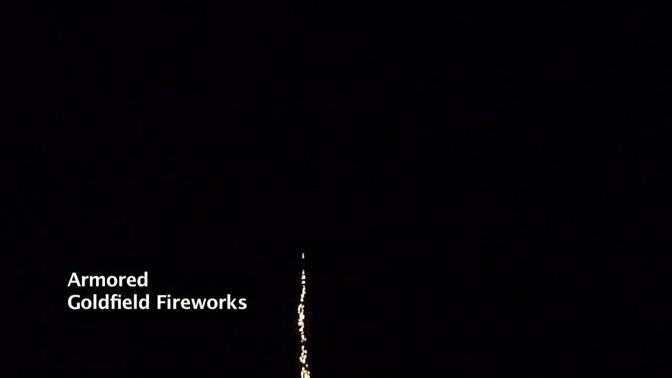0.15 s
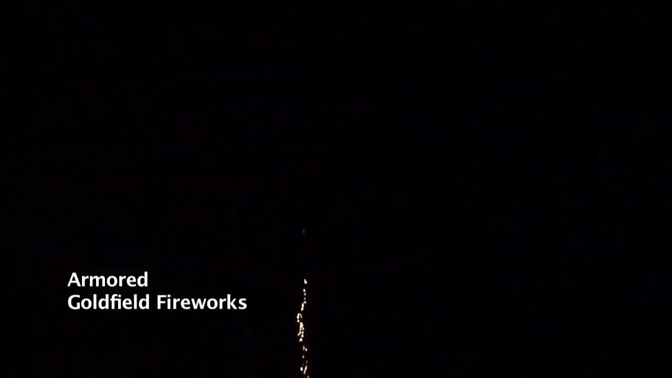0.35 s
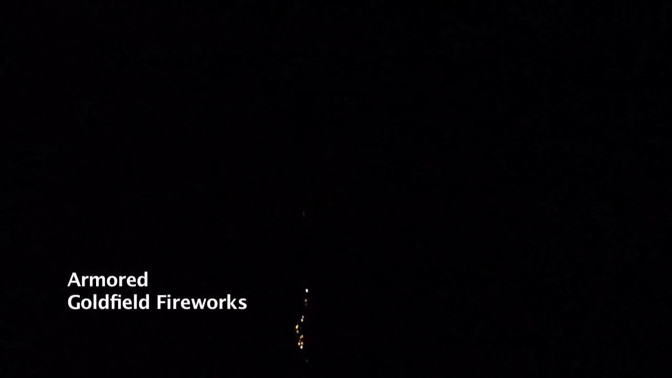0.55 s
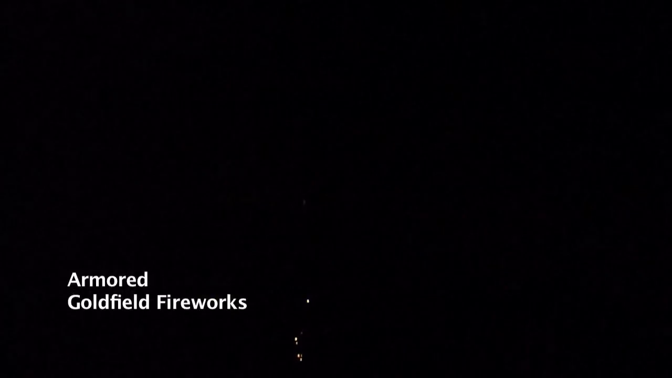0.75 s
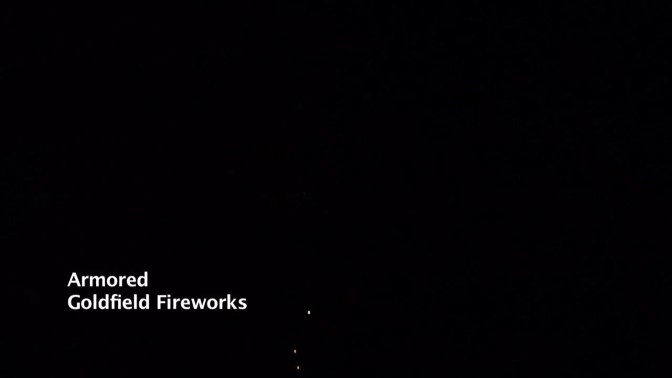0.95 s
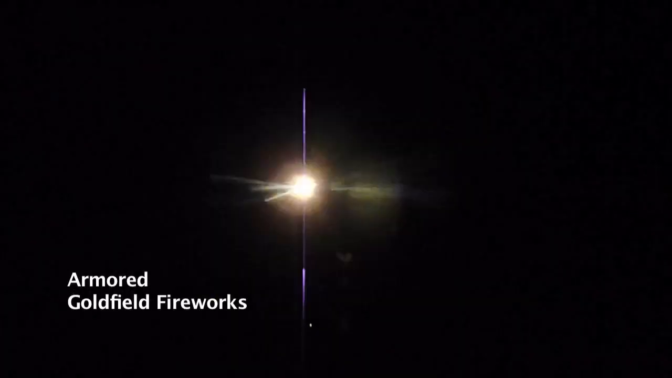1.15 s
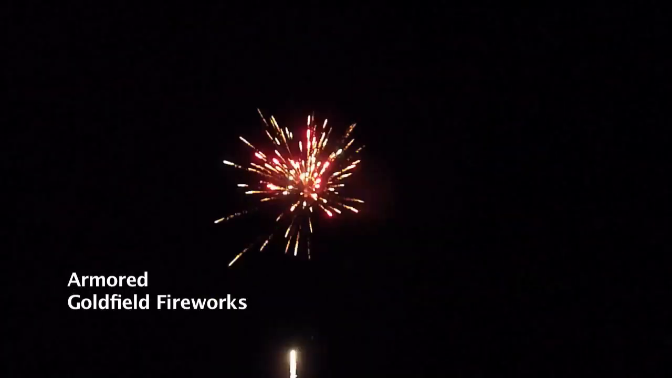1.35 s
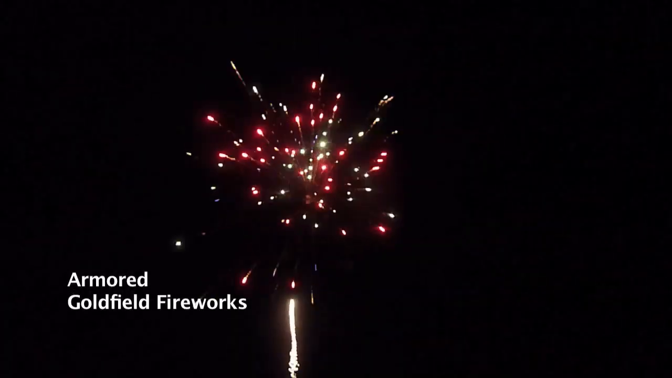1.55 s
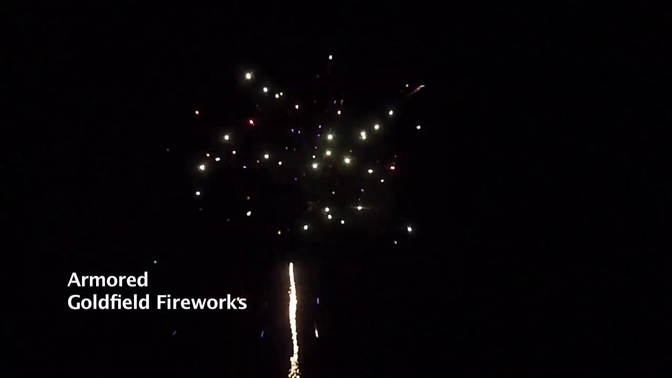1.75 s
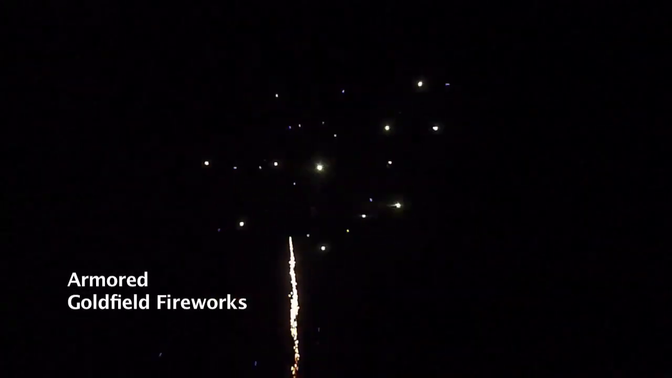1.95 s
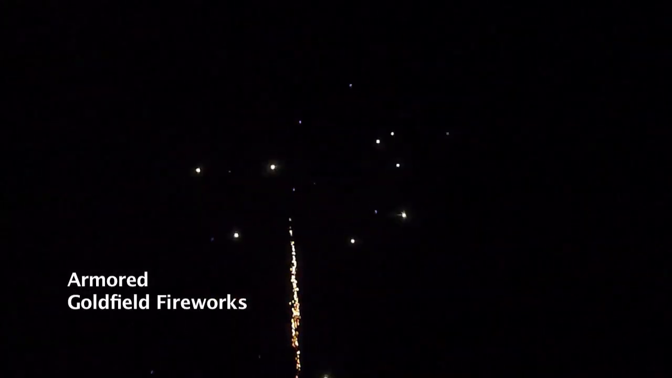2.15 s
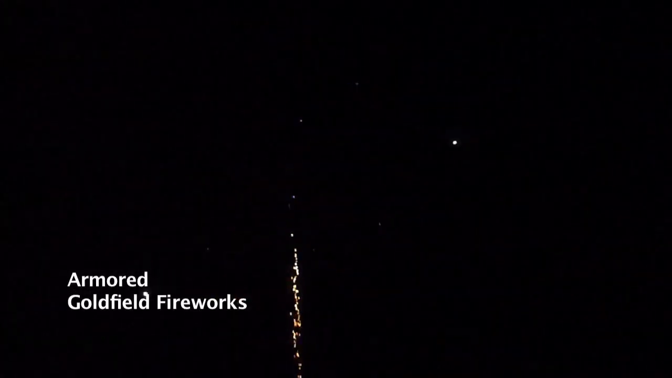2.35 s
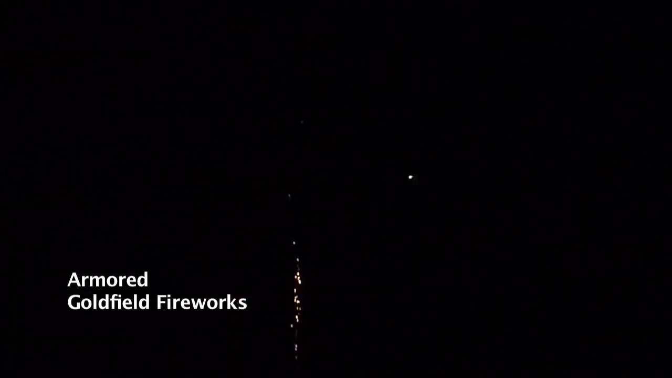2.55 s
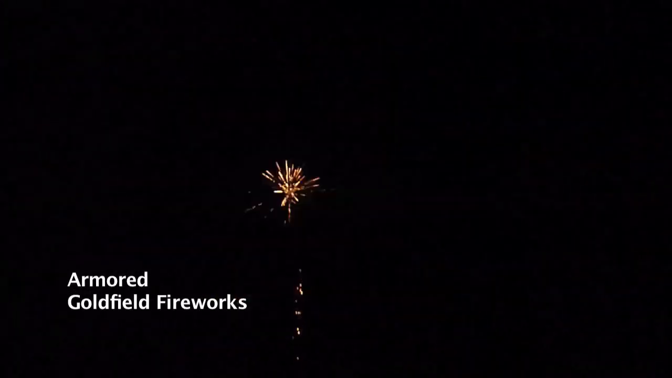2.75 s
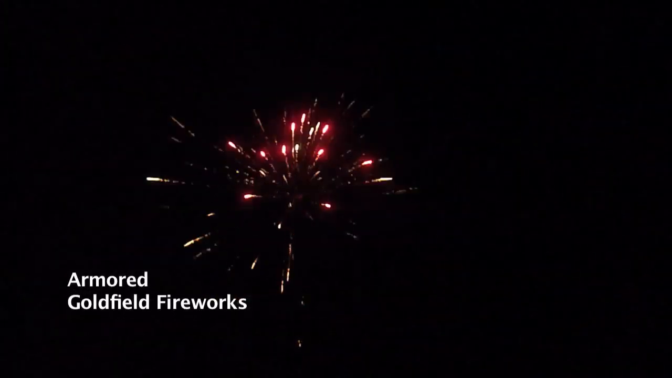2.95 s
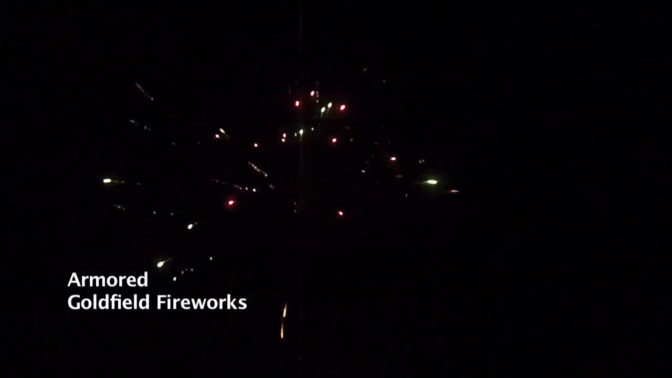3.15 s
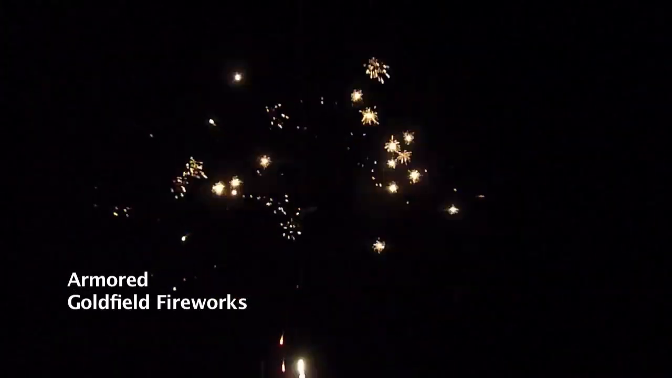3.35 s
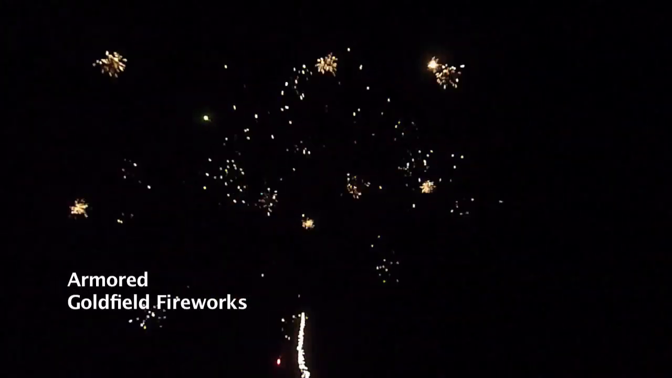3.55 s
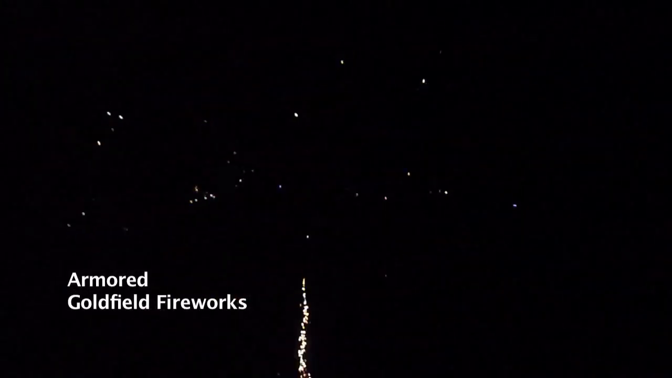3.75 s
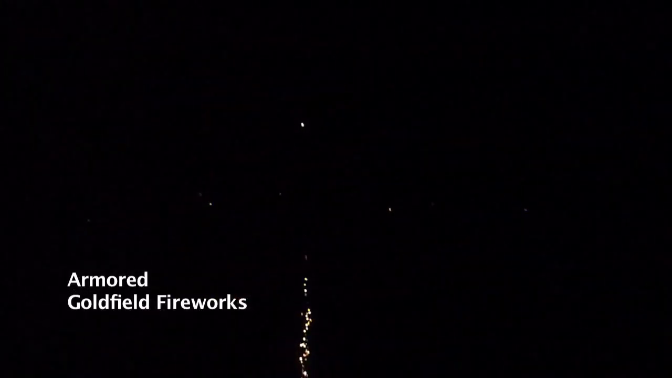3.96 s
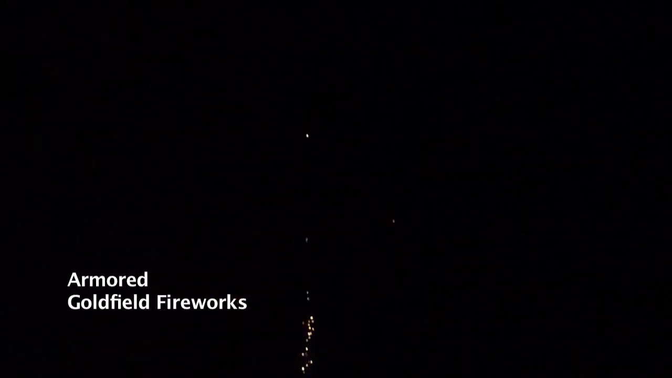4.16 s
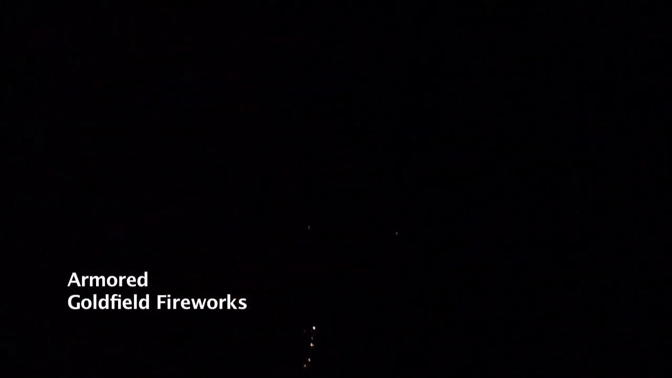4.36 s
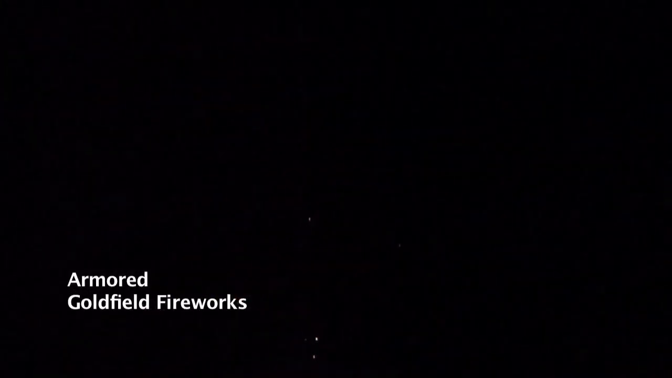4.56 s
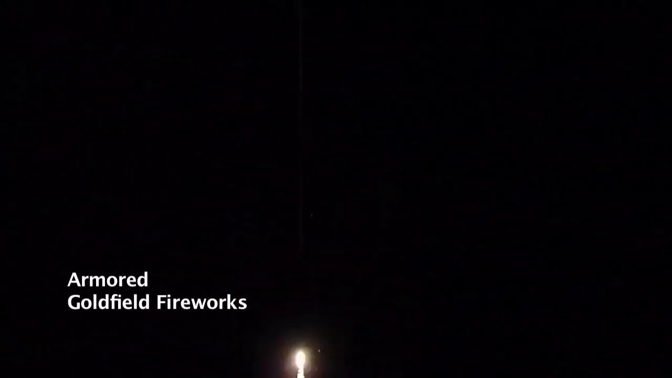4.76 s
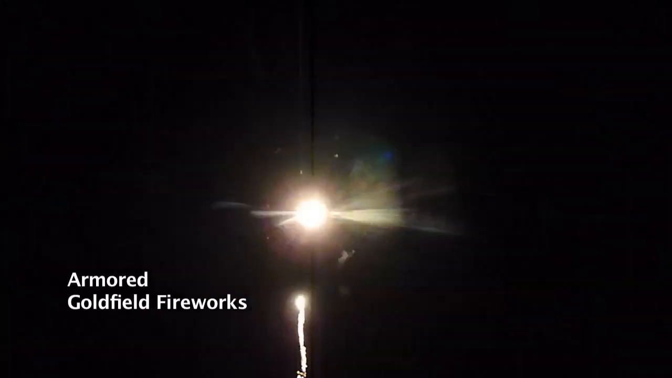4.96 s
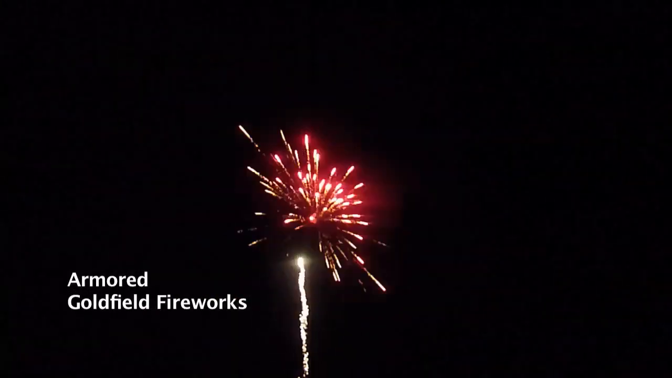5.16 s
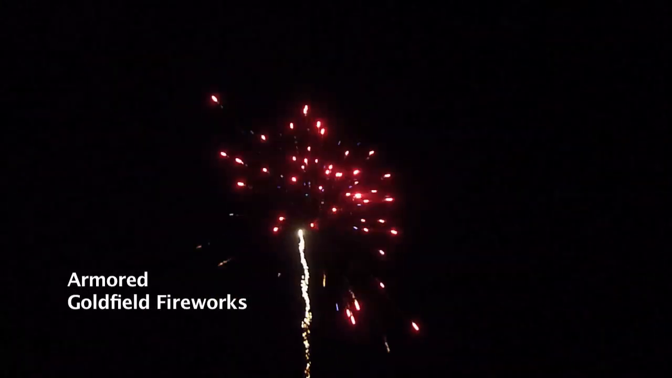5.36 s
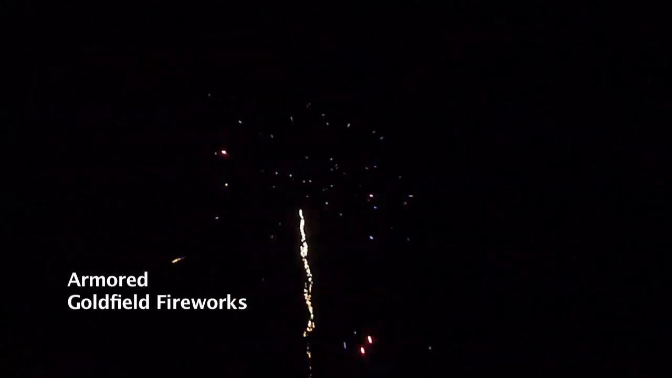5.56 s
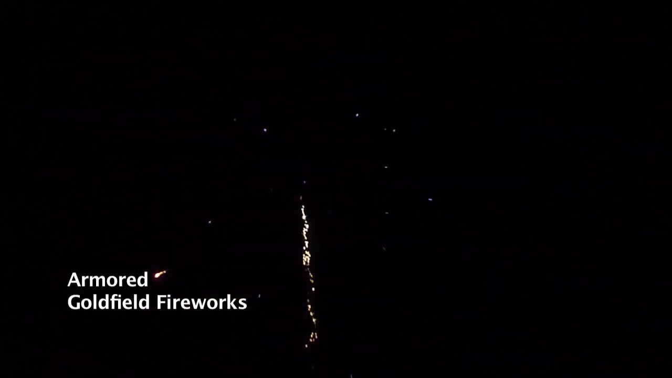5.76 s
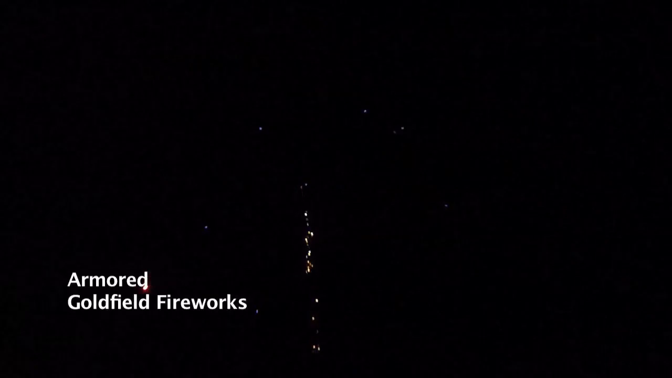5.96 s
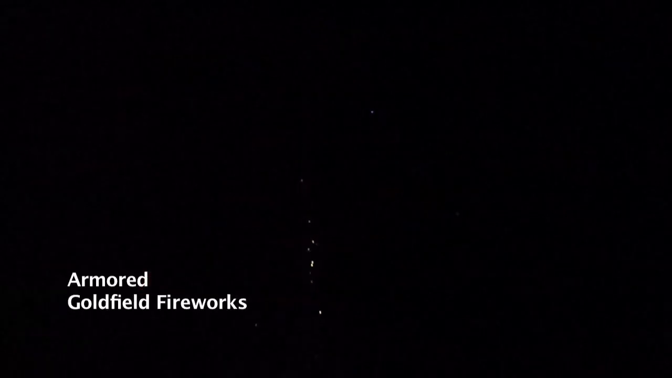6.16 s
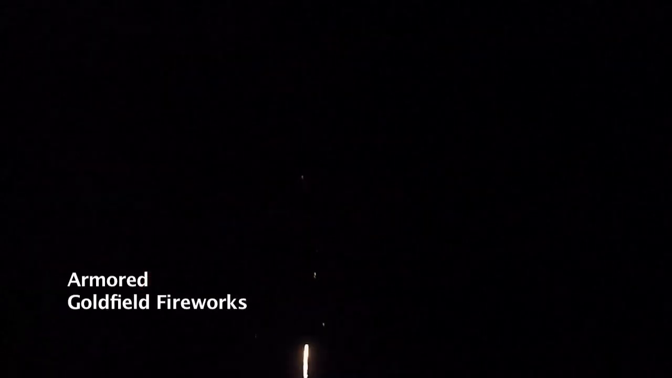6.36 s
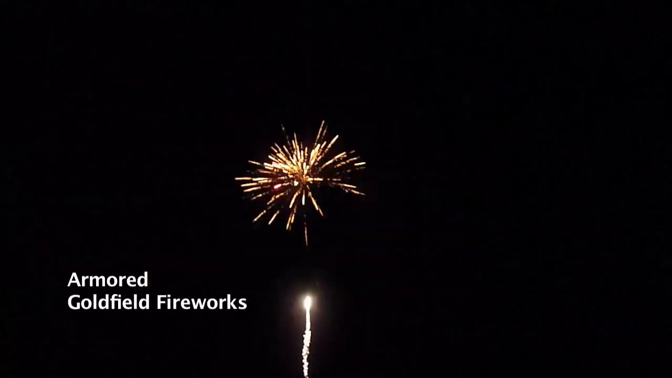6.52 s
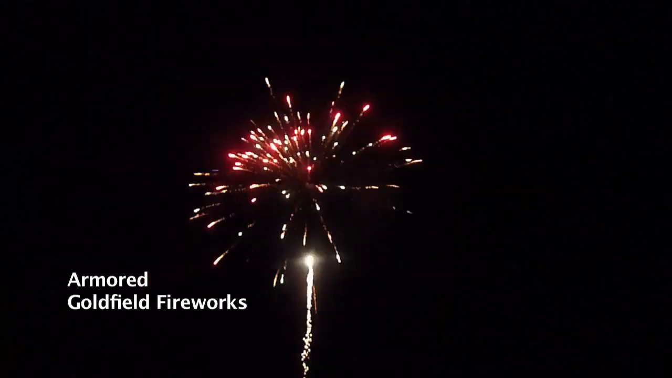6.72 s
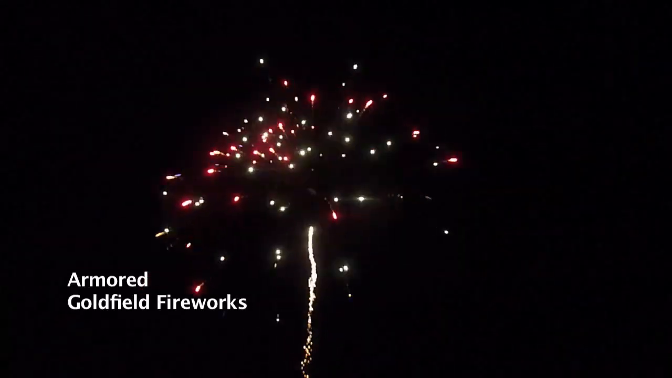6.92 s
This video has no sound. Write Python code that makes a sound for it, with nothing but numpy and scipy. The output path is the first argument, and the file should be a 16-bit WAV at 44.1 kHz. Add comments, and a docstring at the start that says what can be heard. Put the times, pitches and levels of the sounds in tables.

```python
"""Firework cake at night

Lift charges thump in their tubes close by, comets rush and hiss, and shells burst high above the microphone;
after the second burst the stars crackle. Blast waves and scattered noise repeat over sharp echo paths from
ground and walls, enveloped noise makes comets and stars, and low lumpy noise is the far land's roll.
Puffs of wind and a faint whine lie underneath; the bangs overload the microphone."""
import sys
import numpy as np
from scipy import signal
from scipy.fft import rfft, irfft, next_fast_len
from scipy.io import wavfile
from scipy.ndimage import uniform_filter1d, map_coordinates

SR = 44100
rng = np.random.default_rng(int(sys.argv[2]) if len(sys.argv) > 2 else 0)


def int16_out(signal):
    """Quantize to a 16-bit WAV file."""
    q = np.round(np.clip(np.atleast_2d(signal).T, -1, 1) * 32767)
    wavfile.write(sys.argv[1], SR, q.astype(np.int16))


N = 308259


def amp(db):
    """dB to gain."""
    return 10 ** (np.asarray(db) / 20)


def unit(x):
    """Scaled to rms 1."""
    return x / np.sqrt(np.mean(x ** 2) + 1e-20)


def curves(rows):
    """One value per sample for each column after the time."""
    times, *columns = np.transpose(rows)
    return [np.interp(np.arange(N) / SR, times, column) for column in columns]


def wobble(rate):
    """A smooth random curve, rate knots a second."""
    return map_coordinates(rng.standard_normal(int(N * rate / SR) + 4), [np.arange(N) * rate / SR])


def filtered(x, response):
    """x passed through a complex response of frequency."""
    m = next_fast_len(N + SR // 2)
    return irfft(rfft(x, m) * response(np.fft.rfftfreq(m, 1 / SR)), m)[..., :N]


def low_cut(x, cut_hz):
    """A causal second-order high-pass."""
    return filtered(x, lambda hz: (1j * hz / (cut_hz + 1j * hz)) ** 2)


def noise(spectrum):
    """Noise of rms 1 coloured by (f/Hz, level/dB) points on a log axis."""
    f, db = np.transpose(spectrum)

    def colour(hz):
        return amp(np.interp(np.log(hz + 1), np.log(f + 1), db))

    return unit(filtered(rng.standard_normal(N), colour))


def add(track, s, sound):
    """Mix a sound into the track from time s on."""
    part = track[round(s * SR):][:len(sound)]
    part += sound[:len(part)]


def swells(starts, levels_db, shape):
    """Summed power of envelopes that rise, hold, then fall steadily in dB."""
    rise, hold, fall = shape
    since = np.maximum(np.arange(N) / SR - np.array(starts)[:, None], 0)
    levels = np.array(levels_db)[:, None] - fall * np.maximum(since - hold, 0)
    gains = amp(levels) * np.minimum(since / rise, 1)
    return np.sum(gains ** 2, axis=0)


def patchy(x, patchy_db):
    """Random gain patches over time and frequency."""
    z = signal.stft(x, nperseg=512)[2]
    across_f = uniform_filter1d(rng.standard_normal(z.shape), 8, 0)
    field = uniform_filter1d(across_f, 12, 1)
    return signal.istft(z * amp(patchy_db * unit(field)), nperseg=512)[1][:N]


# puffs of wind at the microphone: middle t/s, half width/s, level/dB
WIND_PUFFS = [(0.02, .15, -69), (.65, .08, -68), (1.89, 0.077, -54), (2.15, .12, -63), (2.42, .06, -47),
              (2.62, .12, -51), (3.4, .2, -56), (3.65, .08, -60), (4.1, .08, -69), (4.55, .08, -61),
              (4.87, 0.089, -52), (5.7, .08, -65), (6.37, .08, -68), (6.95, .06, -72)]
# colour of wind on the microphone: f/Hz, relative level/dB per Hz
WIND_COLOUR = [(12, -20), (25, -1.5), (60, 4), (100, -6), (200, -46)]
# faint thin tones: f/Hz, middle level/dB
WHINE_TONES = [(2024, -73), (2207, -71), (2471, -77.5), (2622, -69.5)]
# fainter tones in the treble: f/Hz, middle level/dB
TREBLE_TONES = [(8839, -89), (10637, -83), (11687, -83), (11989, -88), (13334, -86), (13485, -93)]
CALM_DB = -82  # wind between puffs
SURGE_DB, SURGE = -55, (.05, 0.12, 76)  # air stirred by each bang: dB; (rise s, hold s, fall dB per s)


def night():
    """Puffs of wind and the stir of each bang buffet the microphone over a faint unsteady whine."""
    t = np.arange(N) / SR
    whine = np.zeros(N)
    for hz, db in WHINE_TONES + TREBLE_TONES:
        level = amp(db + 3.2 * wobble(5))
        whine += level * np.sin(2 * np.pi * hz * t + 2.3 * wobble(17))
    puffs = sum(amp(db - 6 * ((t - s) / width) ** 2) ** 2 for s, width, db in WIND_PUFFS)
    starts = [s for s, *_ in LIFT_SHOTS + SHELL_BURSTS]
    stirred = swells(starts, [SURGE_DB] * len(starts), SURGE)
    wind = np.sqrt(puffs + stirred + amp(CALM_DB) ** 2)
    return wind * amp(1.7 * wobble(6.3)) * noise(WIND_COLOUR) + whine


# slow background under the shots, shared with comets():
# t/s, roll level/dB, rush level/dB, roar level/dB, hiss level/dB
BACKGROUND = [(0, -42, -52.5, -59.5, -65.5), (.43, -50, -56.5, -61.5, -66), (1.2, -51, -59, -61, -64),
              (1.75, -38, -53.5, -56, -63.5), (1.92, -42.5, -52, -57, -66), (2.28, -39, -53, -60.5, -67.5),
              (2.7, -46, -53.5, -64, -66.5), (3.5, -36, -44, -53, -68), (3.7, -42.5, -56, -53, -72),
              (4.15, -50.5, -59.5, -70, -70.5), (4.5, -55, -51.5, -57.5, -64),
              (4.98, -53.5, -58.5, -62.5, -64.5), (5.4, -42.5, -63, -65, -71),
              (5.76, -42.5, -59, -59, -62.5), (6.25, -48, -51.5, -63, -64), (6.45, -49.5, -56.5, -61, -66),
              (6.84, -41, -66, -54, -60.5), (6.99, -38.5, -67, -57, -62)]
# colour of the far roll: f/Hz, relative level/dB per Hz
FAR_COLOUR = [(35, -63), (60, -23), (124, -6.5), (306, 2), (660, -12), (715, -14), (796, -18),
              (1020, -35.5), (1500, -31), (1950, -30), (3300, -120)]
# late low echoes off far walls: t/s, relative level/dB
FAR_THUDS = [(2.2, -22), (2.385, -29), (2.397, -20), (3.735, -32), (3.85, -39), (4.409, -28), (6.171, -27)]
LIFT_ROLL = (0.094, 0.16, 38)  # far echoes of a lift: (rise s, hold s, fall dB per s)
BURST_ROLL = (0.11, .22, 93)  # and of a burst


def far_land():
    """The lumpy low roll of distant echoes swells after each bang, with a few single thuds."""
    lift_s, *_, lift_db = np.transpose(LIFT_SHOTS)
    burst_s, *_, burst_db = np.transpose(SHELL_BURSTS)
    background_db, *_ = curves(BACKGROUND)
    echoes = swells(lift_s, lift_db, LIFT_ROLL) + swells(burst_s, burst_db, BURST_ROLL)
    lumps = wobble(30)  # fresh echoes are lumpier than the background
    fresh = echoes * amp(4.2 * lumps) ** 2
    background = amp(background_db + 2.4 * lumps) ** 2
    out = np.sqrt(fresh + background) * noise(FAR_COLOUR)
    t = np.arange(SR // 20) / SR
    for s, db in FAR_THUDS:
        envelope = 3 * amp(db - 60 * t / 0.019) * (1 - np.exp(-t / 0.0044))
        add(out, s - .003, envelope * np.sin(2 * np.pi * 320 * t))
    return out


# how rush, roar and hiss of a comet burn, one row each: rise/s, hold/s, fall/dB per s
COMET_SWELLS = [(0.12, 0.21, 50), (.05, .17, 48.5), (.03, 0.071, 59)]
# the same for a burst's stars: rise/s, hold/s, fall/dB per s
STAR_SWELLS = [(.03, 0.045, 92), (.06, 0.19, 56), (.03, .1, 39)]
# colour of the low rush: f/Hz, relative level/dB per Hz
RUSH_COLOUR = [(400, -24), (650, 1), (1000, -1), (1500, -6.5), (2200, -8.5), (4000, -33)]
# colour of the middle roar: f/Hz, relative level/dB per Hz
ROAR_COLOUR = [(900, 8), (1600, -13.5), (2400, 6.5), (3100, 4.5), (3800, -0.5), (6000, -6.5), (9000, -45)]
# colour of the high hiss: f/Hz, relative level/dB per Hz
HISS_COLOUR = [(2500, -19), (4000, -0.5), (6000, 3), (9000, 0.5), (13500, -4.5), (15000, -4), (16500, -38)]
# thin whistles in the hiss: from t/s, to t/s, f/Hz, level/dB
THIN_WHISTLES = [(0.916, 1.067, 6250, -59), (4.342, 4.645, 5520, -64), (6.085, 6.35, 5250, -67)]


def comets():
    """Comets after each lift and stars after each burst rush, roar and hiss unevenly; some whistle thinly."""
    lift_s, *_, lift_rush, lift_roar, lift_hiss, _ = np.transpose(LIFT_SHOTS)
    burst_s, *_, star_rush, star_roar, star_hiss, _ = np.transpose(SHELL_BURSTS)
    comet_levels = (lift_rush, lift_roar, lift_hiss)
    star_levels = (star_rush, star_roar, star_hiss)
    _, *background_db = curves(BACKGROUND)
    gains = []
    for comet_db, comet, star_db, star, db in zip(comet_levels, COMET_SWELLS,
                                                  star_levels, STAR_SWELLS, background_db):
        burning = swells(lift_s, comet_db, comet) + swells(burst_s, star_db, star)
        gains.append(np.sqrt(burning + amp(db) ** 2))
    rush, roar, hiss = gains
    sputter = wobble(56) + .9 * wobble(16)
    body = rush * noise(RUSH_COLOUR) + roar * noise(ROAR_COLOUR)
    fizz = hiss * amp(0.84 * wobble(180)) * noise(HISS_COLOUR)
    out = patchy(amp(1.2 * sputter) * (body + fizz), patchy_db=1.1)
    for start, end, hz, db in THIN_WHISTLES:
        length = round((end - start) * SR)
        narrow = noise([(hz - 500, -40), (hz - 150, 0), (hz + 150, 0), (hz + 500, -40)])
        add(out, start, amp(db) * np.sqrt(np.hanning(length)) * narrow[:length])
    return out


def bangs(shots, paths, low, high):
    """Each path repeats the blast wave and lets scattered boom and crack die away behind it."""
    waves, boom, crack = np.zeros(N), np.zeros(N), np.zeros(N)  # boom and crack hold power
    t = np.arange(SR // 2) / SR
    for s, db, length, bright_db in shots:
        for delay, push_db, boom_db, crack_db, t60 in paths:
            blur = np.sqrt(abs(delay))  # paths farther in time from the bang stretch the wave, round its front
            u = t[:SR // 20] / (length + 0.0011 * blur)
            front = (1 - np.exp(-t / (.00003 + 0.00069 * blur))) ** 2
            arrival = s + delay * (1 + .01 * rng.normal())
            swing = np.cos(np.pi / 2 * u ** min(0.72 + 0.92 * blur, 1))
            decay = np.exp(-.45 * u / (1 + 4 * blur))
            add(waves, arrival, -amp(db + push_db) * front[:len(u)] * swing * decay)
            fade = amp(-60 * t / t60) ** 2
            boom_rise = 1 - np.exp(-t / (0.0011 + 0.011 * blur ** 2))
            add(boom, arrival, amp(db + boom_db) ** 2 * fade * boom_rise)
            crack_rise = 1 - np.exp(-t / (.00005 + 0.11 * blur ** 3))  # far scatter arrives gradually
            crack_fade = fade ** 1.17  # the treble dies first
            add(crack, arrival, amp(db + crack_db + bright_db) ** 2 * crack_fade * crack_rise ** 2)
    return low_cut(waves, 206) + np.sqrt(boom) * noise(low) + np.sqrt(crack) * noise(high)


# lift charges close by, and their comets: t/s, relative level/dB, brightness/dB, whoosh level/dB,
# rush level/dB, roar level/dB, hiss level/dB, roll level/dB
LIFT_SHOTS = [(0.7284, 2.5, -2, -34, -37.5, -41.5, -44.5, -39.5),
              (2.728, 2.5, -3, -42, -44, -39.5, -44.5, -45), (4.180, 0, -1, -42.5, -50, -49.5, -49.5, -52),
              (5.787, 2.5, -1.5, -33.5, -45.5, -44.5, -43, -41.5)]
# lead-in, bang and echoes of a lift: mean time from the bang/s, push/dB, boom/dB, crack/dB, boom t60/s
LIFT_ARRIVALS = [(-.006, -12, -15.5, -33.5, .1), (0, 5.5, -5.5, -11, 0.032), (.002, 7.5, -5.5, -5, 0.028),
                 (.0055, -3.5, -6, -19, 0.13), (.014, -6.5, -22, -30, 0.052), (0.0361, 2, -6.5, -12, 0.025),
                 (0.051, -26, -25, -42, .15), (.12, -25, -42, -47, 0.14), (0.236, -31, -41, -51, 0.23)]
# colour of the boom at the tubes: f/Hz, relative level/dB per Hz
LIFT_BOOM_COLOUR = [(35, -44.5), (60, -16), (193, 3.5), (478, 2), (788, -3), (1360, -15.5), (1640, -22),
                    (2140, -22), (2500, -21), (3250, -53), (5500, -120)]
# colour of the crack at the tubes: f/Hz, relative level/dB per Hz
LIFT_CRACK_COLOUR = [(300, -34), (800, 2), (2000, -3.5), (4000, -3.5), (8000, -11), (12500, -11.5),
                     (15000, -15), (17000, -41)]
# colour of the whoosh, shared with the scatter in crackle(): f/Hz, relative level/dB per Hz
WHOOSH_COLOUR = [(900, -21), (1500, 0.5), (2400, 0), (3500, -0.5), (4500, -11), (8000, -17.5),
                 (14000, -26.5), (16500, -46)]


def lifts():
    """Powder charges throw shells from their tubes: bang, slow surge of air, then the comet's whoosh."""
    shots = [(s, db, .0005, bright_db) for s, db, bright_db, *_ in LIFT_SHOTS]
    out = bangs(shots, LIFT_ARRIVALS, LIFT_BOOM_COLOUR, LIFT_CRACK_COLOUR)
    whoosh, t = np.zeros(N), np.arange(SR // 3) / SR
    for s, db, _, whoosh_db, *_ in LIFT_SHOTS:
        add(out, s, amp(db - 11.5 - 60 * t / 0.07) * np.sin(2 * np.pi * 35 * t))  # surge of air
        add(whoosh, s + 0.051, amp(whoosh_db) * (t / .035) * np.exp(1 - t / 0.032))
    return out + whoosh * noise(WHOOSH_COLOUR)


# shell bursts high above, and their stars: t/s, relative level/dB, blast length/s before path stretch,
# crack brightness/dB, rush level/dB, roar level/dB, hiss level/dB, roll level/dB
SHELL_BURSTS = [(1.2377, 0, 0.00039, 4, -38.5, -43, -52.5, -25),
                (2.7657, 4, 0.00044, -1.5, -50, -41, -40.5, -24.5),
                (5.0121, 1.5, 0.00059, 0, -43.5, -45, -53, -29),
                (6.4793, -1.5, 0.00024, 4, -40.5, -48, -55, -28.5)]
# bang and echoes of a burst: mean time from the bang/s, push/dB, boom/dB, crack/dB, boom t60/s
BURST_ARRIVALS = [(0, 14, -10, -3, .006), (.0017, 7, -6, -20, .05), (.006, -6, -8, -30, .1),
                  (.012, 0, -9, -25, .04), (.0192, 2, -9, -16, .014), (.022, -8, -8, -32, .08),
                  (.031, -8, -12, -38, .06), (.042, -14, -18, -34, .05), (.051, -8, -14, -38, .08),
                  (.057, -18, -20, -38, .4), (.09, -20, -22, -44, .3), (.16, -22, -22, -44, .15),
                  (.172, -14, -22, -44, .15), (.215, -26, -28, -50, .3), (.272, -16, -26, -50, .15),
                  (.33, -22, -28, -54, .3), (.43, -32, -36, -58, .5)]
# colour of the boom overhead: f/Hz, relative level/dB per Hz
BURST_BOOM_COLOUR = [(15, -63), (40, -32), (117, -16), (170, -8), (230, -2), (330, 0), (470, -3),
                     (620, -11), (800, -20), (1200, -30), (2500, -40), (5500, -120)]
# colour of the crack overhead: f/Hz, relative level/dB per Hz
BURST_CRACK_COLOUR = [(300, -21), (800, 7.5), (2000, 6), (4000, 3.5), (8000, -14.5), (14000, -15),
                      (17000, -51)]


def bursts():
    """Shells break high above: blast waves with scattered boom and crack, direct and on every echo path."""
    shots = [(s, db, length, crack_db) for s, db, length, crack_db, *_ in SHELL_BURSTS]
    return bangs(shots, BURST_ARRIVALS, BURST_BOOM_COLOUR, BURST_CRACK_COLOUR)


# crackling stars: t/s, relative level/dB
STAR_POPS = [(3.2679, 0.0), (3.2937, 0.0), (3.3425, -0.4), (3.3518, -2.0), (3.3678, -1.8), (3.3744, -3.7),
             (3.3757, -0.1), (3.3899, -1.2), (3.398, 0.0), (3.4097, -0.1), (3.4131, -1.3), (3.4163, -0.3),
             (3.4268, -1.3), (3.4321, -2.8), (3.4332, -3.7), (3.4372, -1.3), (3.438, -0.9), (3.4399, -4.8),
             (3.441, -3.4), (3.4472, -4.0), (3.4483, -2.4), (3.4511, -3.1), (3.4524, -5.0), (3.4539, -1.6),
             (3.4597, -1.6), (3.4664, -4.1), (3.4677, -4.2), (3.4702, -0.7), (3.4841, -2.6), (3.4877, -0.7),
             (3.4887, -0.4), (3.499, -2.4), (3.509, -0.4), (3.5236, -2.7), (3.5269, -4.4), (3.5295, -1.4),
             (3.5363, -5.3), (3.5404, -1.3), (3.5582, -0.6), (3.5727, -0.1), (3.5822, -3), (3.5829, -1.4),
             (3.6143, -2.2), (3.6171, -0.3), (3.6322, 0.0), (3.6459, -3.1), (3.6501, -5.7), (3.6638, -0.2),
             (3.6715, -0.4), (3.7031, -4.9)]
# partials a pop rings with, varied from pop to pop: middle f/Hz, middle level/dB, t60/s
POP_RING = [(2600, 3.5, 0.0018), (5180, -2.5, 0.00089), (8300, -28, 0.0002)]
DULL_S, DULL_PER_DB = .000012, .000006  # front of a pop (s, s per dB); weaker pops are farther and rounder
POP_ECHO_S, POP_ECHO_DB, POP_ECHO_HZ = .0178, -24, 2400  # the ground returns each pop late and dull
POP_PUSH_HZ, POP_PUSH_DB, POP_PUSH_T60 = 800, -14, .006  # the low push under a pop


def crackle():
    """Each star is a tiny shock that rings briefly, with a short scatter, a faint longer one and a ground echo."""
    pops, scatter, t = np.zeros(N), np.zeros(N), np.arange(SR // 4) / SR
    push = amp(POP_PUSH_DB - 60 * t / POP_PUSH_T60) * np.sin(2 * np.pi * POP_PUSH_HZ * t)
    for s, db in STAR_POPS:
        tilt, detune = rng.normal(0, 1, 2)
        ring = np.zeros(len(t))
        for k, (hz, level, t60) in enumerate(POP_RING):
            fade = amp(level + 4.7 * tilt * k - 60 * t / t60)
            ring += fade * np.sin(2 * np.pi * hz * (1 + 0.1 * detune) * t)
        front = 1 - np.exp(-t / (DULL_S - DULL_PER_DB * db))
        add(pops, s - .00007, -amp(db) * (ring + push) * front)
        tail = amp(-20 - 60 * t / 0.017) ** 2 + amp(-40 - 60 * t / 0.16) ** 2
        add(scatter, s, amp(db) ** 2 * tail)

    def ground(hz):
        band = 1j * hz * 2000 / (POP_ECHO_HZ ** 2 - hz ** 2 + 1j * hz * 2000)  # 2000 Hz wide
        return amp(POP_ECHO_DB) * np.exp(-2j * np.pi * hz * POP_ECHO_S) * band

    return low_cut(pops, 275) + filtered(pops, ground) + np.sqrt(scatter) * noise(WHOOSH_COLOUR)


def scene():
    """Everything that reaches the microphone."""
    return (night() + far_land() + comets() + lifts() + bursts() + crackle())[None]


TOP_HZ = 16500  # nothing passes above


def record(dry):
    """The input flattens peaks, the coupling lets flat tops sag, gain control ducks; then clip and band limit."""
    top = np.where(dry < 0, 1.15, .85)  # the two polarities overload at different levels
    flat = dry / (1 + np.abs(dry / top) ** 6) ** (1 / 6)
    sagged = filtered(flat, lambda hz: 1j * hz / (70 + 1j * hz) / (1 + 1j * hz / 11000))
    keep = np.exp(-1 / (0.0096 * SR))  # the gain recovers in some tens of ms
    load = signal.lfilter([1 - keep], [1, -keep], sagged ** 2)
    ducked = sagged / (1 + 0.97 * np.sqrt(np.abs(load)))
    clipped = np.clip(ducked, -1, 1)
    return filtered(clipped, lambda hz: (hz < TOP_HZ) / np.sqrt(1 + (hz / 14500) ** 24))


dry = scene()
out = record(dry)
int16_out(out)
```